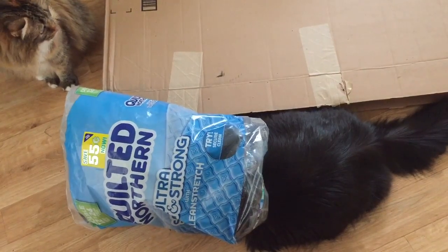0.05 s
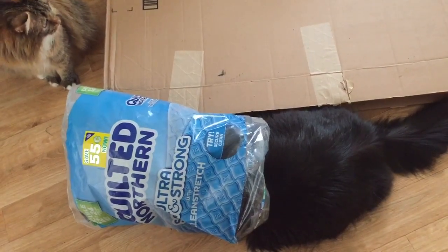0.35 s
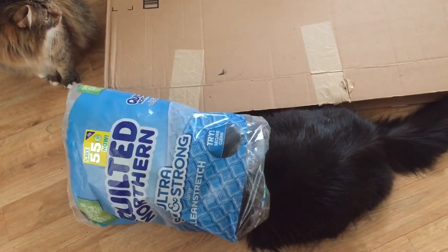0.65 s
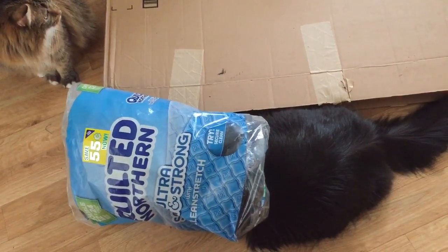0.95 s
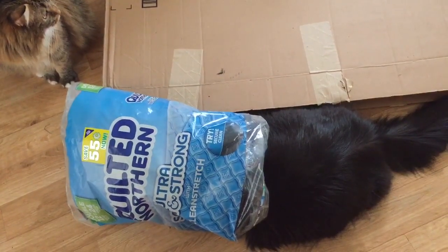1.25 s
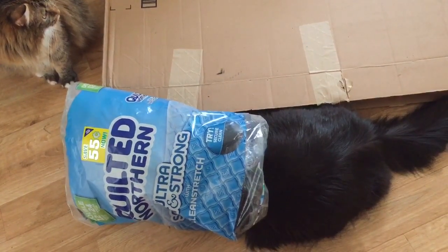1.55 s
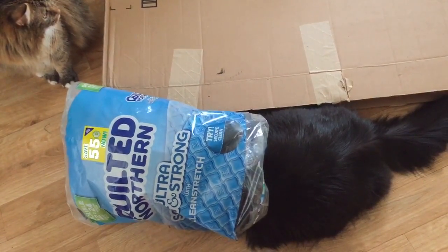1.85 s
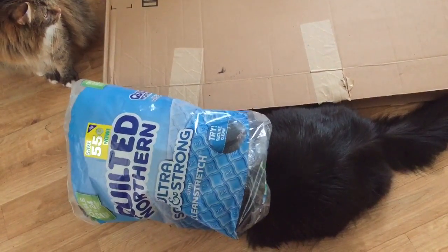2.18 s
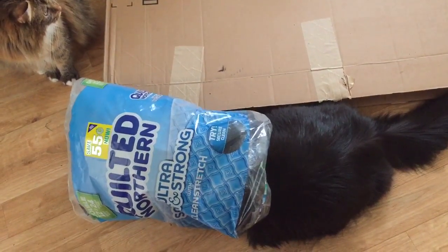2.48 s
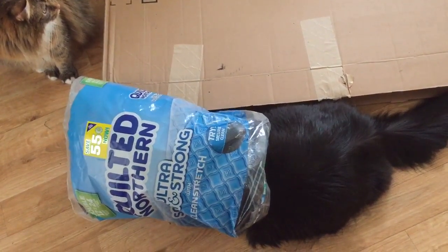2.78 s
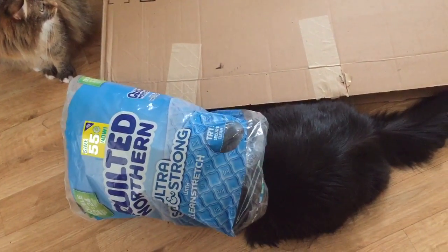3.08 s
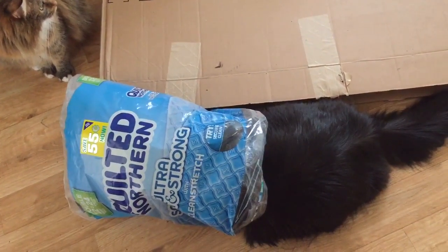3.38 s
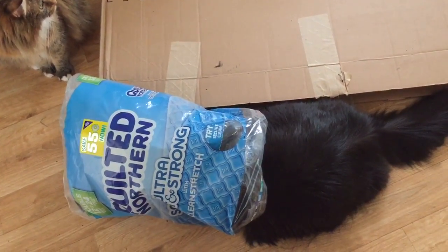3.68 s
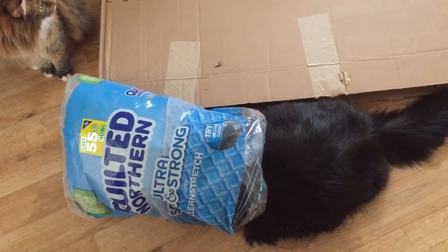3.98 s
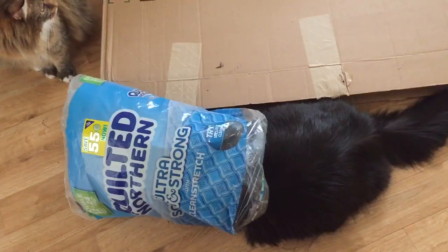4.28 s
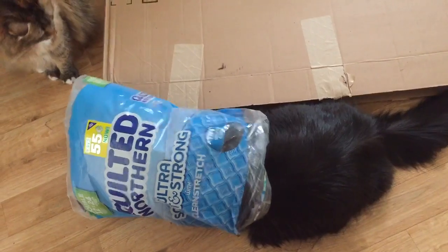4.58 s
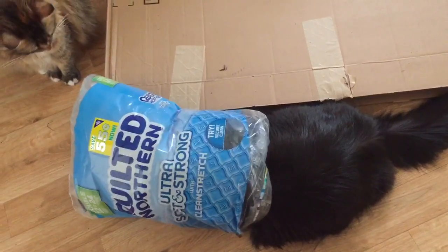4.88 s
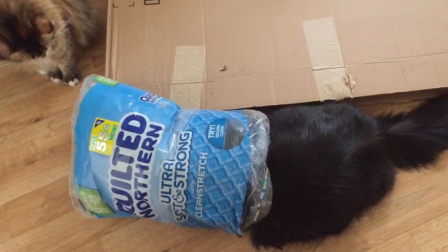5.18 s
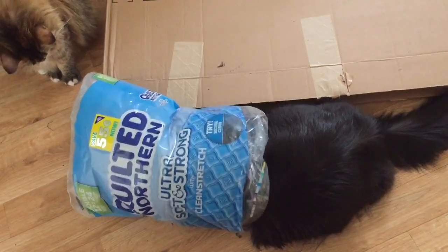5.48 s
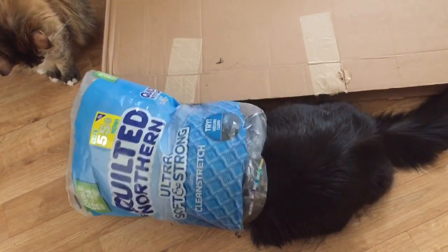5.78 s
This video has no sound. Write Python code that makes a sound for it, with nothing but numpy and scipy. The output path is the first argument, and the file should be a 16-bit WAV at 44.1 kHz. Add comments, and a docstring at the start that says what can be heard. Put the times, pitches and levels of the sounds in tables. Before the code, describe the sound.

A cat moves with its head inside a thin plastic wrapper. A few faint ticks come first, then a cluster of crinkles and sharp little snaps. After a lull, the crackling returns louder, ending with shoves that make the bag rustle and flap. The plastic sounds close, in a small room with a short echo, a soft hiss and a low motor hum.

```python
"""In a small room with a wooden floor, a cat shifts about with its head inside a plastic wrapper.
Each move crumples the thin plastic into a rush of tiny clicks. Single creases snap over with a
crack, and big shoves make the whole bag billow and flap. The room adds a short echo,
and a household motor hums in the background over a soft hiss."""
import sys
import numpy as np
from scipy import signal
from scipy.fft import rfft, irfft, next_fast_len
from scipy.io import wavfile
from scipy.ndimage import uniform_filter1d

SR = 44100
rng = np.random.default_rng(int(sys.argv[2]) if len(sys.argv) > 2 else 0)


def to_wav(s):
    """Save 16-bit WAV."""
    ch = np.atleast_2d(s).T  # columns
    pcm = np.round(np.clip(ch, -1, 1) * 32767)  # PCM
    wavfile.write(sys.argv[1], SR, pcm.astype(np.int16))


N = 257544
TIME = np.arange(N) / SR

# Levels compare rows within a table; the functions set the final loudness.
# tone of the room's hiss: f/Hz, level/dB
AIR_TONE = [(20, -19), (45, 8), (85, 1), (125, 5.5), (200, -2), (300, 4.5), (430, -4), (560, -11.5),
            (700, -7), (1000, -9.5), (2000, -13), (4000, -20), (9000, -27.5), (10500, -29.5), (17500, -34)]
# notes of the mains and motor hum: f/Hz, level/dB
HUM_NOTES = [(58.6, -56.5), (117.5, -69.5), (176.5, -72), (235.5, -77.5), (294, -78.5), (344.9, -56),
             (932, -81), (1034, -80)]
# how long the echo takes to fade by 60 dB: f/Hz, t/s
ECHO_FADE = [(150, 0.39), (600, 0.22), (2000, 0.25), (6000, 0.25), (15000, 0.18)]
# a few short bounces inside the hollow of the bag: delay/s, level/dB
ECHO_BOUNCES = [(.0021, -37), (.0046, -28), (.0078, -12.5), (0.013, -7), (0.0188, -18)]
# wide panels of the bag flapping over: t/s, level/dB, f/Hz, time to fade by 60 dB/s
PANEL_FLAPS = [(2.057, -47, 330, 0.056), (2.278, -41, 248, 0.095), (2.803, -46, 1130, 0.062),
               (4.281, -37.5, 1040, 0.058), (4.711, -23.5, 1240, 0.12), (4.737, -30.5, 280, 0.057),
               (5.426, -26, 200, 0.08), (5.541, -17, 447, 0.059), (5.597, -21.5, 165, 0.051),
               (5.627, -41, 200, .05), (5.787, -29.5, 500, 0.13), (5.8, -15.5, 237, 0.036),
               (5.831, -22, 180, .06)]
# tone of a crease's crack: f/Hz, level/dB
CRACK_TONE = [(200, -36), (800, -12), (2000, -2.5), (4000, 3), (6500, 5.5), (9000, 1.5), (10500, -1.5),
              (13000, 0), (17500, -12)]
# the main creases snapping: t/s, level/dB, brightness/(dB per octave), ring f/Hz, ring over crack/dB
CREASE_SNAPS = [(0.367, -55.5, -8, 2350, 5), (1.05, -50, -1, 1640, 5.5), (1.3586, -57.5, -18, 2860, 10),
                (1.5504, -57, -10, 5000, -3), (1.672, -47.5, -3.5, 3620, 5), (1.8084, -46, -3.5, 4300, -6),
                (2.056, -31.5, -8, 4340, -7.5), (2.0593, -41, 2, 2020, 20), (2.234, -44, -6, 3600, -6),
                (2.2477, -38.5, -6, 3730, 0), (2.2626, -39, -9, 6430, 7), (2.2763, -38, -0.5, 5900, -3),
                (2.2793, -31.5, -15, 1290, -4), (2.4608, -40, 10, 6040, -3.5), (2.5834, -50, -3, 1140, 12),
                (2.6075, -41, -7, 1010, 21), (2.6172, -41, -7.5, 1060, -5), (2.6634, -35.5, 8.5, 1390, -14),
                (2.6704, -42, 3, 9000, 1), (2.6812, -43, -10, 1400, -1), (3.1785, -57, -7, 6750, 4),
                (3.9406, -50, -10.5, 6450, -6.5), (4.0596, -44, 3, 9000, -13), (4.0649, -45, 12, 3730, 11),
                (4.2808, -37, 2.5, 3650, 3.5), (4.2822, -32.5, -6.5, 1880, 9),
                (4.4394, -44.5, -1, 1200, -4), (4.637, -45, -13, 2650, -13), (4.6647, -29.5, -6, 2230, 2),
                (4.71, -23.5, 1, 1530, 11), (4.7356, -28.5, -8.5, 1900, -13), (4.7775, -38, 1, 9200, -3),
                (4.833, -37, -6, 2180, 0), (4.8616, -38.5, -13, 1410, -3), (5.2905, -37.5, -4.5, 5400, -4),
                (5.3942, -46, 0, 4300, 0), (5.436, -34.5, 20, 3680, 3), (5.539, -26, -11.5, 2180, -1),
                (5.819, -25.5, 2.5, 6740, -1), (5.8262, -29, -2, 2420, 2)]
# tone of the crumpling plastic: f/Hz, level/dB
PLASTIC_TONE = [(50, -42), (90, 9), (250, 7.5), (500, 0.5), (800, -1.5), (1400, -0.5), (2100, -1.5),
                (3000, -7), (3800, -6), (6300, -11), (8000, -18), (9400, -11.5), (10600, -19.5),
                (17500, -27)]
# shoves that make the air in the bag billow: t/s, swell/s, hold/s, fade/(dB per s), level/dB
BAG_BILLOWS = [(2.031, 0.032, .01, 200, -57), (2.25, .035, .02, 104, -55.5), (4.631, 0.02, 0.092, 250, -48),
               (5.408, 0.026, .01, 200, -39), (5.506, 0.031, .07, 260, -43.5),
               (5.782, 0.024, .04, 200, -34.5)]
# the cat's moves: t/s, swell/s, hold/s, fade/(dB per s), crinkle level/dB, rustle level/dB
CAT_MOVES = [(0.994, 0.04, 0.0058, 300, -80, -61.5), (1.639, 0.023, 0.022, 350, -61, -56.5),
             (1.79, 0.014, .005, 300, -67, -67), (2.009, 0.014, 0.033, 265, -54, -47),
             (2.228, 0.022, 0.026, 256, -48.5, -47), (2.438, 0.018, 0.0069, 304, -62.5, -63),
             (2.564, 0.036, 0.011, 400, -60, -56.5), (2.64, 0.017, 0.018, 188, -55.5, -56),
             (2.909, 0.023, 0.0065, 200, -67.5, -61.5), (4.04, 0.016, 0.0057, 126, -58, -51.5),
             (4.419, 0.011, 0.014, 302, -56.5, -55), (4.627, 0.048, 0.05, 269, -41.5, -37),
             (4.761, 0.016, 0.0073, 155, -52.5, -48.5), (4.849, 0.007, 0.0043, 600, -76, -57.5),
             (5.393, 0.044, 0.039, 176, -37, -33.5), (5.529, 0.01, 0.0041, 234, -47.5, -34.5),
             (5.763, 0.035, 0.045, 200, -40.5, -36)]


def from_db(db):
    """Turn decibels into a number to multiply by."""
    return 10 ** (np.asarray(db) / 20)


def rms_one(x):
    """Scale a sound so its average power is one."""
    return x / np.sqrt(np.mean(x ** 2) + 1e-20)


def evened(x, span_s):
    """Even out the loudness, judged over a short span."""
    return x / np.sqrt(np.maximum(uniform_filter1d(x ** 2, int(span_s * SR)), 1e-12))


def at_hz(table, hz):
    """Read between a table's rows, with all octaves equally wide."""
    pitches, values = np.array(table).T
    return np.interp(np.log(np.maximum(hz, 1)), np.log(pitches), values)


def band(x, low_hz, high_hz, order=2):
    """Keep the sound between two frequencies."""
    edges = [low_hz, min(high_hz, .45 * SR)]
    return signal.sosfilt(signal.butter(order, edges, "band", fs=SR, output="sos"), x)


def coloured(x, tone):
    """Make a sound's lows and highs follow a tone table."""
    size = 2 * next_fast_len(len(x))
    hz = np.arange(size // 2 + 1) * SR / size
    cepstrum = irfft(np.log(from_db(at_hz(tone, hz))))
    cepstrum[1:size // 2] *= 2   # first half only, doubled, so nothing rings early
    response = np.exp(rfft(cepstrum[:size // 2], size))
    return irfft(rfft(x, size) * response)[:len(x)]


def drift(per_s):
    """A random wobble, roughly one up or down."""
    points = rng.standard_normal(int(N / SR * per_s) + 2)
    return np.interp(TIME * per_s, np.arange(len(points)), points)


def add(out, start_s, sound):
    """Mix a short sound in at its time."""
    start = round(start_s * SR)
    out[start:start + len(sound)] += sound[:max(N - start, 0)]


def room_air(level_db):
    """The air's soft noise; the level is that of its hiss above the bass."""
    air = coloured(rng.standard_normal(N + SR), AIR_TONE)[SR:]
    return from_db(level_db) * air / np.std(band(air, 500, 16000))


def motor_hum(waver_db, wander_radians):
    """A motor hums a few notes, each wavering a little in loudness and pitch."""
    hum = np.zeros(N)
    for hz, db in HUM_NOTES:
        gain = np.sqrt(2) * from_db(db + waver_db * drift(15))
        phase = 2 * np.pi * (hz * TIME + rng.random()) + wander_radians * drift(1.8)
        hum += gain * np.sin(phase)
    return hum


def room_echo(x, tail_db, build_s, bounce_db):
    """A few near bounces, then a blur of echoes whose highs die before its lows."""
    t, edges = TIME[:SR * 2 // 3], 75 * 2. ** np.arange(9)
    tail = np.zeros(len(t))
    for low, high in zip(edges, edges[1:]):
        fade_s = at_hz(ECHO_FADE, np.sqrt(low * high))
        tail += band(rng.standard_normal(len(t)), low, high) * from_db(-60 * t / fade_s)
    tail *= 1 - np.exp(-t / build_s)
    response = from_db(tail_db) * tail / np.sqrt(np.sum(tail ** 2))
    for delay_s, db in ECHO_BOUNCES:
        response[int(delay_s * SR)] += from_db(db + bounce_db)
    return signal.fftconvolve(x, response)[:N]


def flaps(gain_db, octaves_each_side):
    """A wide panel of the bag slaps over: a dull burst of noise around its pitch."""
    out, t = np.zeros(N), TIME[:SR // 4]
    ratio = 2 ** octaves_each_side
    for start_s, db, hz, fade_s in PANEL_FLAPS:
        panel = evened(band(rng.standard_normal(len(t)), hz / ratio, hz * ratio), span_s=0.0146)
        add(out, start_s, from_db(db + gain_db - 60 * t / fade_s) * panel)
    return out


def extra_snaps(per_move, over_crinkle_db=1.5, brightness=-1, ring_db=5, settle_s=0.048):
    """Each move flips a few more creases at random; gives rows like CREASE_SNAPS."""
    rows = []
    for start_s, swell_s, hold_s, _, crinkle_db, _ in CAT_MOVES:
        for when, smallness in rng.random((per_move, 2)):
            snap_s = start_s + swell_s / 2 + when * (swell_s / 2 + hold_s + settle_s)
            hz = 1030 * (9100 / 1030) ** smallness   # smaller patches ring higher
            rows.append((snap_s, crinkle_db + over_crinkle_db, brightness, hz, ring_db))
    return rows


def snaps(gain_db, crack_s, ring_s, overtone_db, flutter_db, flutter_s):
    """A crease flips with a crack, its flat patch rings on two notes and the plastic nearby flutters."""
    out, t = np.zeros(N), TIME[:SR // 25]
    for start_s, db, brightness, hz, ring_db in CREASE_SNAPS + extra_snaps(per_move=2):
        grit, shiver = rng.standard_normal((2, len(t)))
        burst = grit * np.exp(-t / crack_s)
        flutter = from_db(flutter_db) * shiver * np.exp(-t / flutter_s)
        tone = [(f, level + brightness * np.log2(np.clip(f, 1200, 9500))) for f, level in CRACK_TONE]
        crack = coloured(burst + flutter, tone)
        crack = band(crack, min(0.19 * hz, 1600), SR / 2)   # small patches give off little bass
        age = t / (ring_s * np.sqrt(2000 / hz))             # and their ring swells and dies sooner
        overtone = from_db(overtone_db) * np.sin(2 * np.pi * 1.71 * hz * t) * np.exp(-age)
        ring = (np.sin(2 * np.pi * hz * t) + overtone) * age * np.exp(-age)
        snap = rms_one(crack) + from_db(ring_db) * rms_one(ring)
        add(out, start_s, from_db(db + gain_db) * rms_one(snap))
    return out


def clicks(per_s, spread_db):
    """Random clicks: many small, a few large."""
    happens = rng.random(N) < per_s / SR
    return happens * rng.choice([-1, 1], N) * from_db(spread_db * np.minimum(rng.exponential(1, N), 4))


def buckles(scatter_db, fold_db, fold_ratio):
    """Tiny dents crack low and high at once; stiffer folds pop, each at its own pitch."""
    cracks = clicks(per_s=4000, spread_db=3.5)
    edges = 50 * 2 ** (np.arange(18) / 2)
    crackle = np.zeros(N)
    for k, (low, high) in enumerate(zip(edges, edges[1:])):
        uneven = cracks * from_db(scatter_db * rng.standard_normal(N))   # each click gets its own tone
        crackle += band(uneven, low, high, order=1) * (-1) ** k
    pops = clicks(per_s=2400, spread_db=4.5)
    pitches = np.geomspace(600, 15000, 40)
    chosen = rng.integers(0, len(pitches), N)
    folds = sum(band(pops * (chosen == k) + 1e-18, hz / fold_ratio, hz * fold_ratio, order=1)
                for k, hz in enumerate(pitches))
    return coloured(rms_one(crackle) + from_db(fold_db) * rms_one(folds), PLASTIC_TONE)


def push(start_s, swell_s, hold_s, fade_db_per_s, rise_db=20, grip_s=0.007):
    """Loudness of one push: it grips the plastic, swells, holds and fades."""
    age = TIME - start_s
    grip = np.clip(1 + age / grip_s, 0, 1)
    swell_db = rise_db * np.minimum(age / swell_s - 1, 0)
    fade_db = fade_db_per_s * np.maximum(age - swell_s - hold_s, 0)
    return grip * from_db(np.maximum(swell_db - fade_db, -200))


def crumple(crinkle_db, rustle_db, billow_db):
    """As the cat moves, small folds crinkle and wide ones rustle; hard shoves make the bag billow."""
    plastic = buckles(scatter_db=3.0, fold_db=-7.5, fold_ratio=1.022)
    crisp = sum(from_db(db + crinkle_db) * push(*timing) for *timing, db, _ in CAT_MOVES)
    dull = sum(from_db(db + rustle_db) * push(*timing) for *timing, _, db in CAT_MOVES)
    deep = sum(from_db(db + billow_db) * push(*timing) for *timing, db in BAG_BILLOWS)
    crinkle = crisp * evened(band(plastic, 2730, 20000, order=3), span_s=0.0084)
    rustle = dull * evened(band(plastic, 308, 2880, order=3), span_s=0.008)
    billow = deep * evened(band(plastic, 54, 290, order=3), span_s=0.034)
    return crinkle + rustle + billow


def scene():
    """The wrapper and its echo, over the hiss and hum."""
    wrapper = crumple(crinkle_db=-3.0, rustle_db=-1.0, billow_db=-1.5)
    wrapper += snaps(gain_db=-16.0, crack_s=0.00069, ring_s=0.00068, overtone_db=-7.0,
                     flutter_db=-24.0, flutter_s=0.01)
    wrapper += flaps(gain_db=-8.0, octaves_each_side=0.79)
    echo = room_echo(wrapper, tail_db=-8.0, build_s=0.0011, bounce_db=-13.5)
    background = room_air(level_db=-65.93) + motor_hum(waver_db=1.3, wander_radians=0.087)
    return (background + echo + wrapper)[None]


def record(dry):
    """Cut away the very highest sounds, above 18200 Hz."""
    return signal.sosfilt(signal.ellip(10, .1, 80, 18200, fs=SR, output="sos"), dry)


dry = scene()
out = record(dry)
to_wav(out)
```